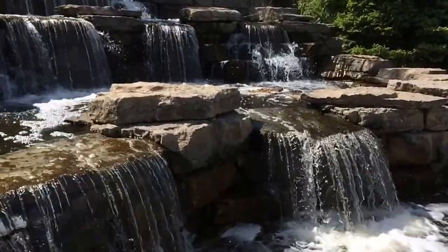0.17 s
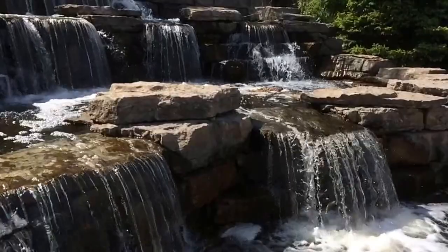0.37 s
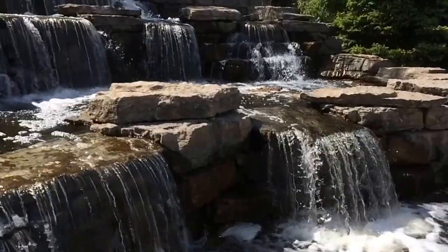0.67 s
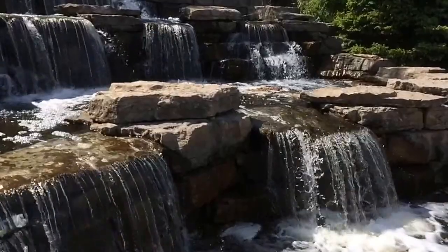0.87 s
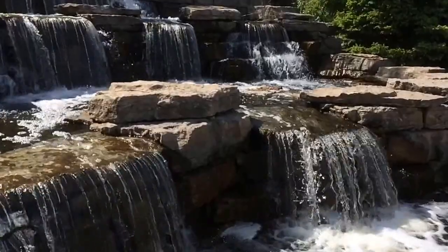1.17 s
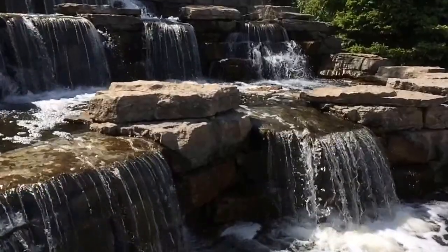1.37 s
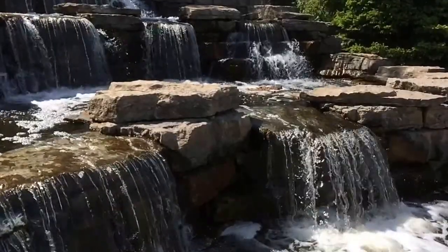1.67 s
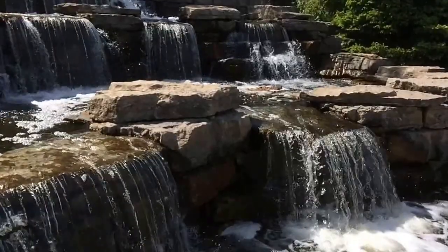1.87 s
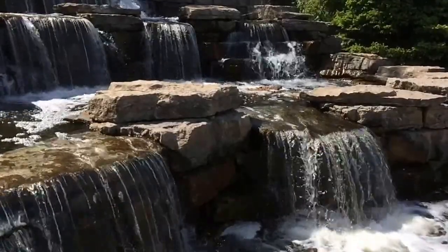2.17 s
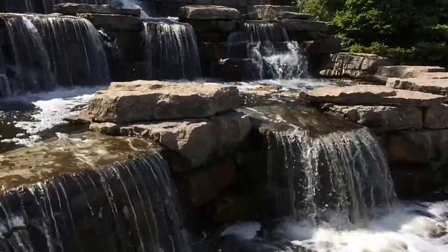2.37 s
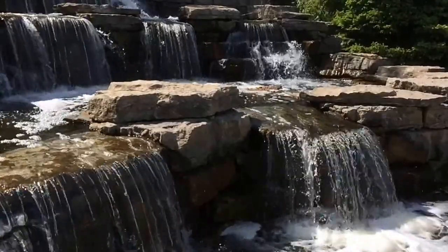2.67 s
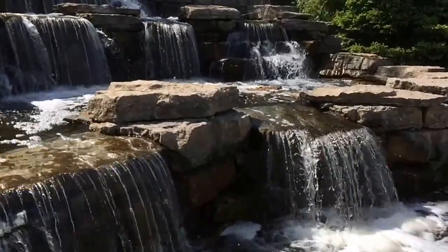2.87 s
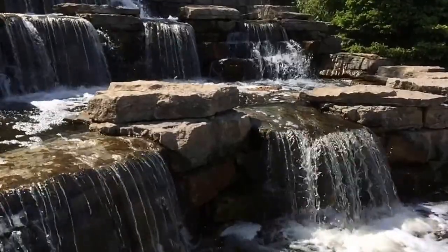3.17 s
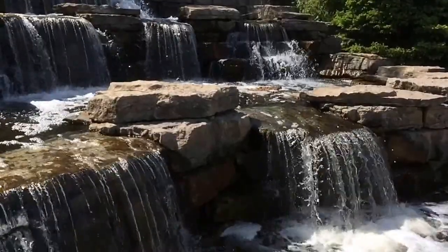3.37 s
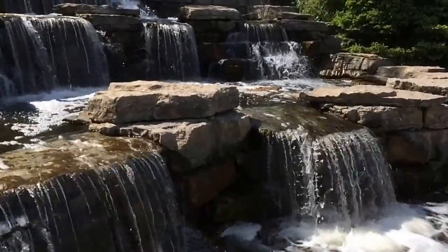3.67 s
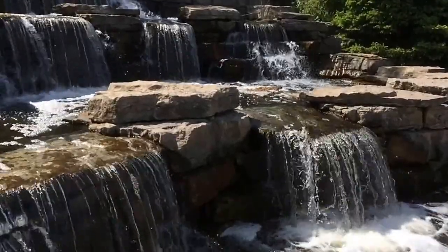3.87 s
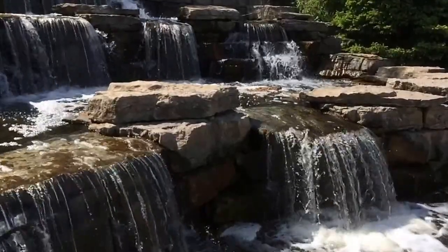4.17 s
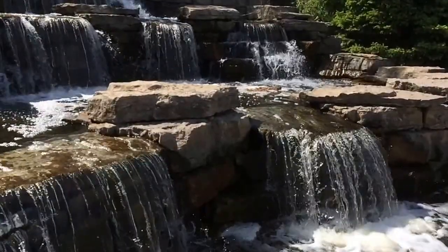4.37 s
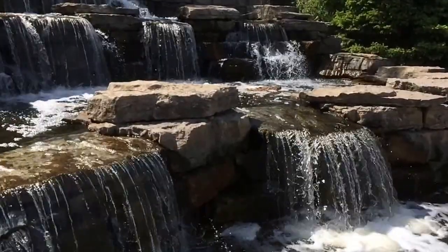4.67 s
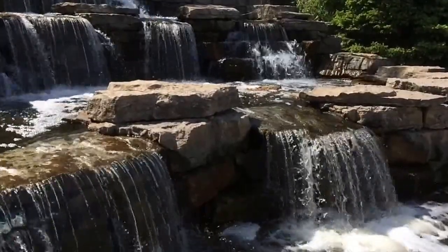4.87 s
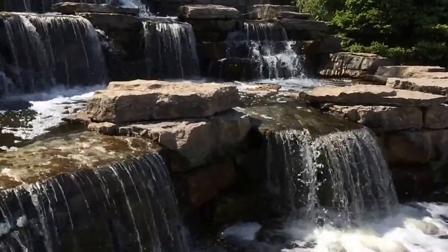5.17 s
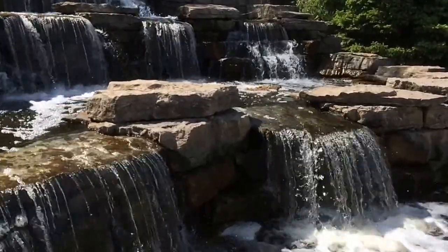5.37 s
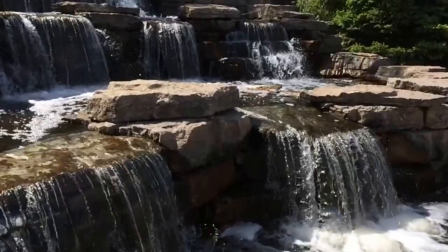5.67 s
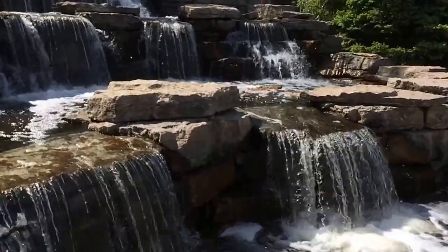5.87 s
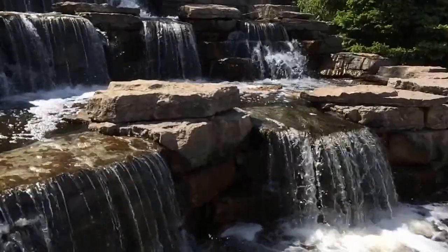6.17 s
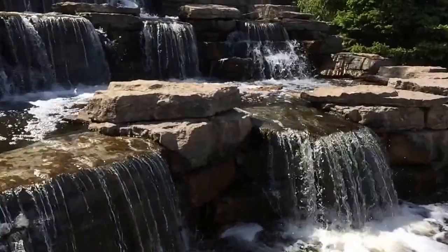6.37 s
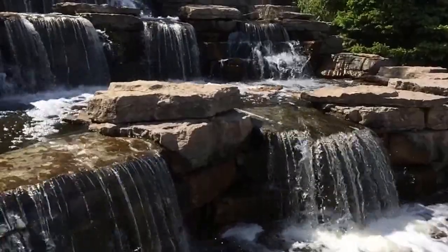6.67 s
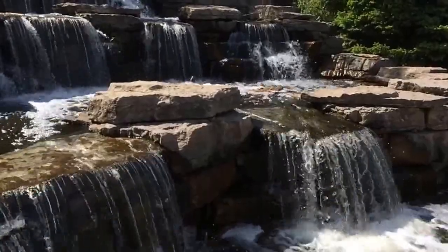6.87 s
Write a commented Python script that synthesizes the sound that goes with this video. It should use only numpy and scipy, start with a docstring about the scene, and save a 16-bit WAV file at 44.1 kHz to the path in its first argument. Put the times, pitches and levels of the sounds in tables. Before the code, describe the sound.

Water spills over stone ledges into a pool in a park. At first it is a dull, muffled, steady rush over a deep rumble. A little past halfway it dips for a moment as the treble opens, then quickly swells into a loud, bright rush. Falling sheets pound the pool, with faint bubbling in the foam and spray pattering on stone. Both ears hear the same sound.

```python
"""A dull, muffled rush of water over a deep rumble comes first. Near 4.6 s it dips briefly
while the treble opens, then it swells to a bright, loud rush. The water spills over stone
ledges into a pool: falling sheets pound the pool, bubbles ring in the foam and spray
patters on stone. Both ears hear the same sound."""
import sys
import numpy as np
from scipy import signal
from scipy.fft import rfft, irfft, next_fast_len
from scipy.io import wavfile
from scipy.ndimage import uniform_filter1d, map_coordinates

SR = 44100
rng = np.random.default_rng(int(sys.argv[2]) if len(sys.argv) > 2 else 0)


def waveform_to_disk(signal):
    """Save audio, clipped to [-1, 1], as 16-bit WAV at the path in sys.argv[1]."""
    frames = np.transpose(np.atleast_2d(signal))
    scaled = np.clip(frames, -1, 1) * 32767
    samples = np.round(scaled).astype(np.int16)
    wavfile.write(sys.argv[1], SR, samples)


N = 310023
TIME = np.arange(N) / SR
BASS_SURGE_DB, FOAM_SURGE_DB = 0.24, 0.25  # how much the flow sways the level

# The steps in which the treble opens during the dip: start_s, top_hz
TREBLE_STEPS = [(4.584, 5720), (4.675, 7830), (4.743, 10100), (4.785, 11600)]


def amp(db):
    """Turn decibels into a gain to multiply by."""
    return 10 ** (np.asarray(db) / 20)


def unit(x):
    """Scale a signal to an average (rms) level of 1."""
    return x / np.sqrt(np.mean(x ** 2) + 1e-20)


def wobble(per_s):
    """A smooth curve through per_s random values a second."""
    return map_coordinates(rng.standard_normal(int(N * per_s / SR) + 4), [TIME * per_s])


def filtered(x, gain_at):
    """Turn each frequency of x up or down by gain_at(hz)."""
    size = next_fast_len(N + SR // 2)
    return irfft(rfft(x, size) * gain_at(np.fft.rfftfreq(size, 1 / SR)), size)[:N]


def coloured(x, tone):
    """Shape x by a tone curve, whose rows say how strong each pitch is next to the others."""
    pitch_hz, level_db = np.transpose(tone)
    return filtered(x, lambda hz: amp(np.interp(np.log(hz + 1), np.log(pitch_hz + 1), level_db)))


def low_pass(x, top_hz):
    """Cut away the sound above top_hz with a steep edge."""
    return filtered(x, lambda hz: .5 - .5 * np.tanh((hz / top_hz - 1) * 300))


def switch_on(start_s):
    """A gain that goes quickly but smoothly from 0 to 1 at start_s."""
    return .5 + .5 * np.tanh((TIME - start_s) / .002)


def fade_out(start_s, decay_s):
    """A gain that holds at 1, then falls to about a third every decay_s."""
    return np.exp(-np.maximum(TIME - start_s, 0) / decay_s)


def flow(level_db, surge_db):
    """The gain of a steady flow that surges slightly at random."""
    return amp(level_db + surge_db * wobble(per_s=4.3))


def rumble():
    """Deep noise that lies under the muffled water."""
    # Tone of the rumble: pitch_hz, level_db
    rumble_tone = [(7.1, -39), (12, -8.5), (38, -1.5), (90, -6.5), (120, -52.5), (200, -120)]
    return unit(coloured(rng.standard_normal(N), rumble_tone))


def bubbles(low_hz, high_hz, cycles, rise, spread_db, count):
    """Bubbles of random size ring and fade, rising in pitch as they near the surface."""
    when, pitch, size = rng.random((count, 3)).T[:, :, None]
    hz = low_hz * (high_hz / low_hz) ** pitch
    t = np.arange(int(2 * cycles / low_hz * SR)) / SR
    age = t * hz / cycles  # at age 1 a bubble has nearly died away
    # High bubbles ring briefly, so they start stronger to keep the energy per Hz even.
    strength = hz * amp(-spread_db * np.log(np.maximum(size, .01)))
    glide = 1 + rise * np.minimum(age, 2) / 2
    ring = strength * np.exp(-np.pi * age) * np.sin(2 * np.pi * hz * t * glide)
    index = (when * N).astype(int) + np.arange(len(t))
    return unit(np.bincount(index.ravel(), ring.ravel(), N)[:N])


def spray(clump_db, count):
    """Droplets tick on stone and water, in clumps as the sheet tears."""
    when, size = rng.random(count), rng.uniform(-1.18, 1, count)
    ticks = np.bincount((when * N).astype(int), size, N)
    return unit(ticks * amp(clump_db * wobble(per_s=60)))


def churn(patchy_db):
    """Countless splashes merge into a hiss with short louder and softer patches."""
    hiss = signal.stft(rng.standard_normal(N), nperseg=256)[2]
    patches = uniform_filter1d(rng.standard_normal(hiss.shape), size=5, axis=0)  # smooth over pitch
    patches = uniform_filter1d(patches, size=16, axis=1)  # smooth over time
    splashes = signal.istft(hiss * amp(patchy_db * unit(patches)), nperseg=256)[1]
    return unit(splashes[:N])


def plunge(tone, pocket_db, throb_db):
    """The falling sheets pound the pool and drive down pockets of air that boom."""
    pockets = bubbles(low_hz=80.3, high_hz=429, cycles=7, rise=0.068, spread_db=2.5, count=900)
    pounding = rng.standard_normal(N) + amp(pocket_db) * pockets
    throb = amp(throb_db * wobble(per_s=13))
    return unit(coloured(pounding * throb, tone))


def rush(tone, patchy_db, bubble_db, fizz_db, spray_db, flutter_db):
    """Foam, ringing bubbles, fizz and spray flutter together with the flow."""
    foam = churn(patchy_db)
    ringing = bubbles(low_hz=450.6, high_hz=3540, cycles=27, rise=.06, spread_db=1.5, count=1100)
    fizz = bubbles(low_hz=3430, high_hz=13000, cycles=14, rise=.1, spread_db=2.5, count=4000)
    patter = spray(clump_db=1.5, count=16000)
    water = foam + amp(bubble_db) * ringing + amp(fizz_db) * fizz + amp(spray_db) * patter
    flutter = amp(flutter_db * wobble(per_s=25))
    return unit(coloured(water * flutter, tone))


def dull_fall():
    """The falling water with no treble, over a deep rumble."""
    # Tone of the muffled pounding in the pool: pitch_hz, level_db
    pool_tone = [(53, -41), (90, -9.5), (102, -6), (124, -4), (220, -1.5), (302, -6), (344, -5),
                 (420, -9.5), (550, -48), (920, -120)]
    # Tone of the muffled foam: pitch_hz, level_db
    foam_tone = [(250, -38), (420, -6.5), (544, -3.5), (607, -6), (660, -4.5), (710, -5), (954, -5.5),
                 (1250, -7.5), (1960, -7), (2110, -8.5), (2560, -8), (3340, -11.5), (3800, -13),
                 (4940, -54), (8360, -120)]
    pool = flow(-41.9, BASS_SURGE_DB) * plunge(pool_tone, pocket_db=-23.5, throb_db=0.2)
    foam = flow(-37, FOAM_SURGE_DB) * rush(
        foam_tone, patchy_db=0.8, bubble_db=-19, fizz_db=-20.5, spray_db=-11.5, flutter_db=0.03)
    deep = flow(-42.8, BASS_SURGE_DB) * rumble()
    return low_pass(pool + foam + deep, top_hz=3840)


def bright_fall():
    """The falling water with all its hiss and a fuller plunge."""
    # Tone of the full pounding in the pool: pitch_hz, level_db
    pool_tone = [(15, -57), (25, -37), (34, -9), (45, -13), (59, -2), (97, -3.5), (193, -0.5), (288, -5.5),
                 (328, -2), (360, -7), (420, -8.5), (550, -47), (920, -120)]
    # Tone of the bright foam: pitch_hz, level_db
    foam_tone = [(250, -33), (420, -11.5), (453, -5.5), (502, -2.5), (941, -2.5), (1210, -5.5),
                 (1490, -4.5), (1680, -6.5), (2240, -5), (2450, -6.5), (3720, -7), (5240, -9), (7280, -8.5),
                 (11100, -10.5), (14900, -14)]
    pool = flow(-30.5, BASS_SURGE_DB) * plunge(pool_tone, pocket_db=-20.5, throb_db=0)
    foam = flow(-23.5, FOAM_SURGE_DB) * rush(
        foam_tone, patchy_db=0.83, bubble_db=-22, fizz_db=-13, spray_db=-11.5, flutter_db=0.2)
    return pool + foam


def dip(water):
    """The water turned down low; it comes in at the first treble step and brightens with each."""
    # How far each pitch is turned down: pitch_hz, level_db
    dip_tone = [(100, -16), (1000, -16.5), (5000, -16), (7500, -20), (11000, -21)]
    quiet = coloured(water, dip_tone)
    gates = [switch_on(start_s) for start_s, _ in TREBLE_STEPS] + [0]
    steps = zip(TREBLE_STEPS, gates, gates[1:])
    return sum(low_pass(quiet, top_hz) * (gate - next_gate) for (_, top_hz), gate, next_gate in steps)


def scene():
    """Muffled water, a short dip, then a fast swell to the bright rush."""
    bright = bright_fall()
    muffled = dull_fall() * fade_out(start_s=TREBLE_STEPS[0][0], decay_s=.025)
    held_back = fade_out(start_s=4.82, decay_s=0.049)  # the rush swells as this falls
    water = muffled + held_back * dip(bright) + (1 - held_back) * bright
    return np.array([water, water])


def record(dry):
    """Cut away the very highest treble."""
    return np.array([low_pass(channel, top_hz=15330) for channel in dry])


dry = scene()
out = record(dry)
waveform_to_disk(out)
```